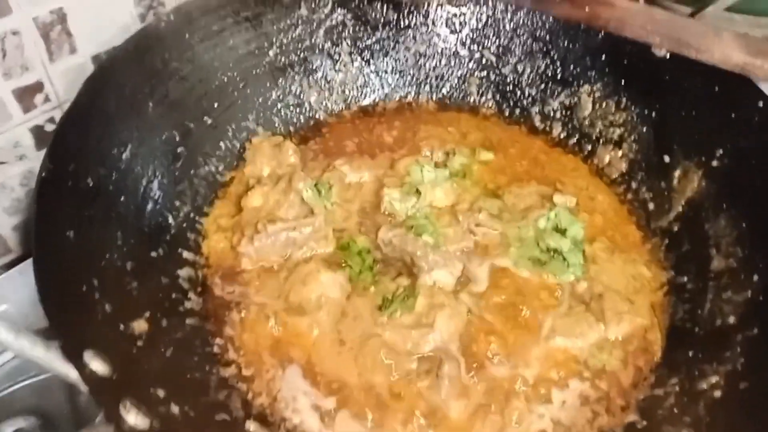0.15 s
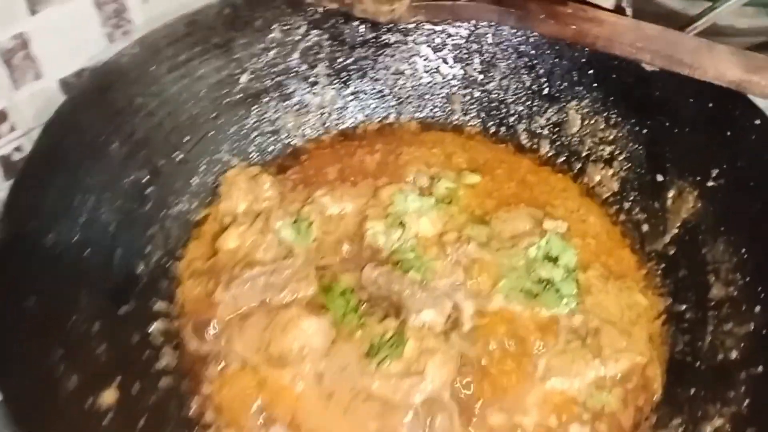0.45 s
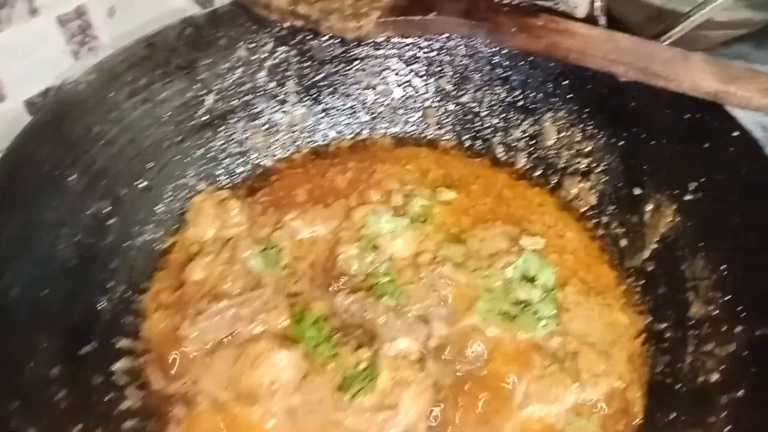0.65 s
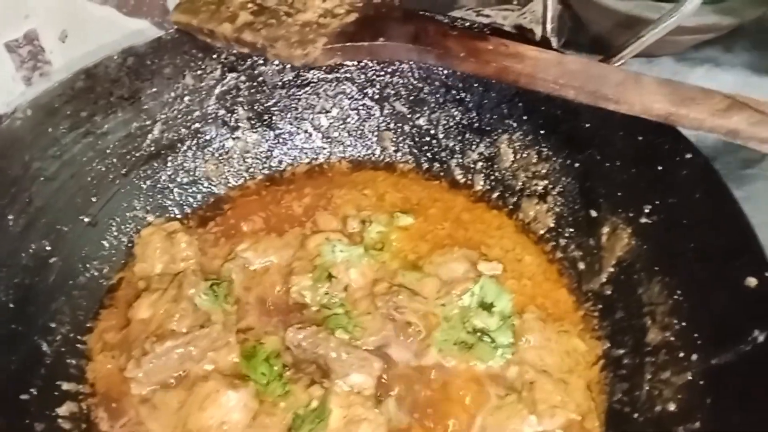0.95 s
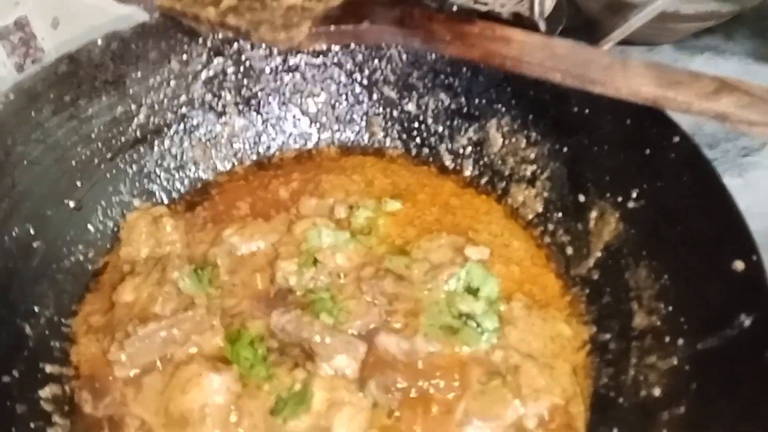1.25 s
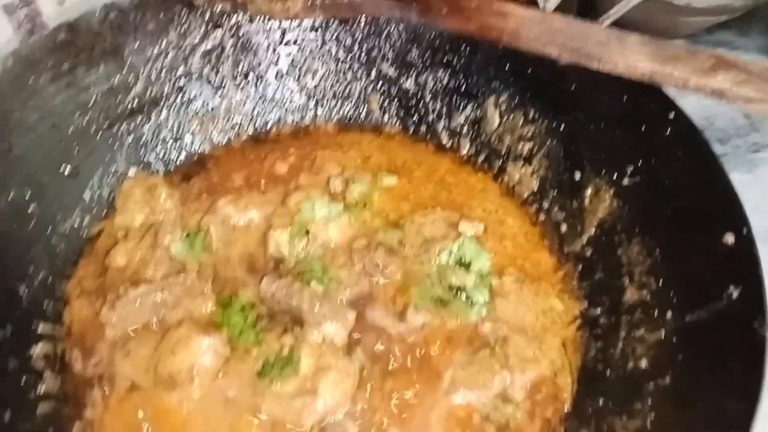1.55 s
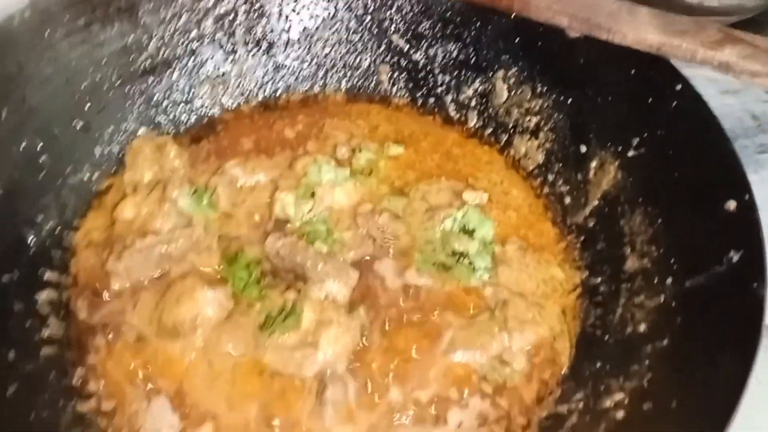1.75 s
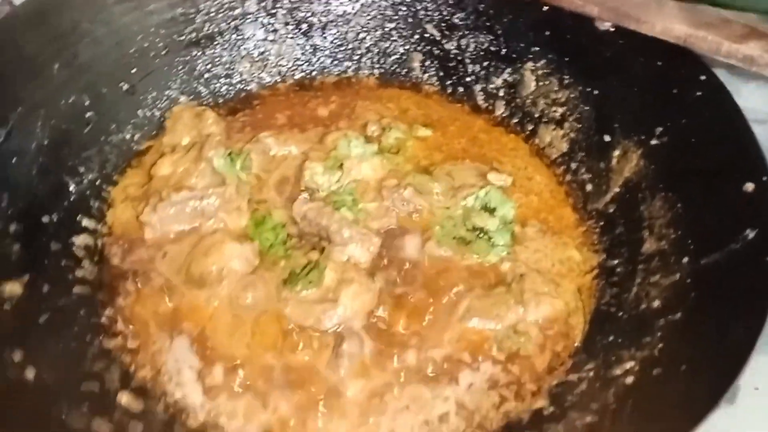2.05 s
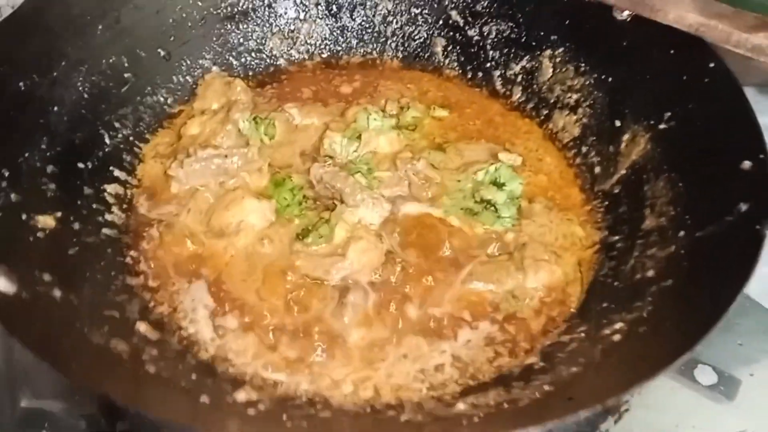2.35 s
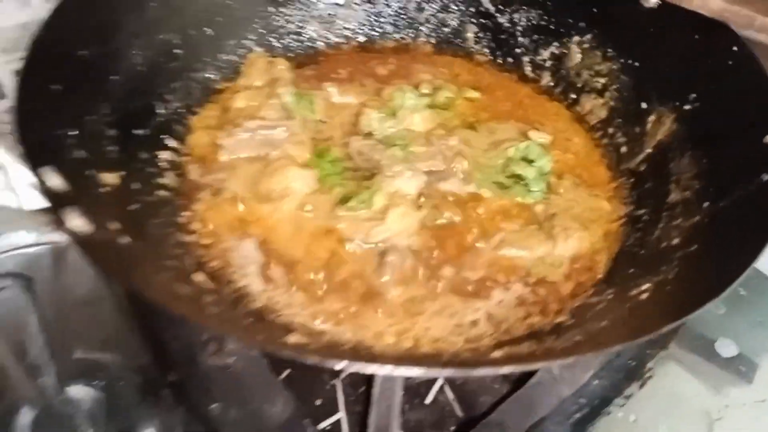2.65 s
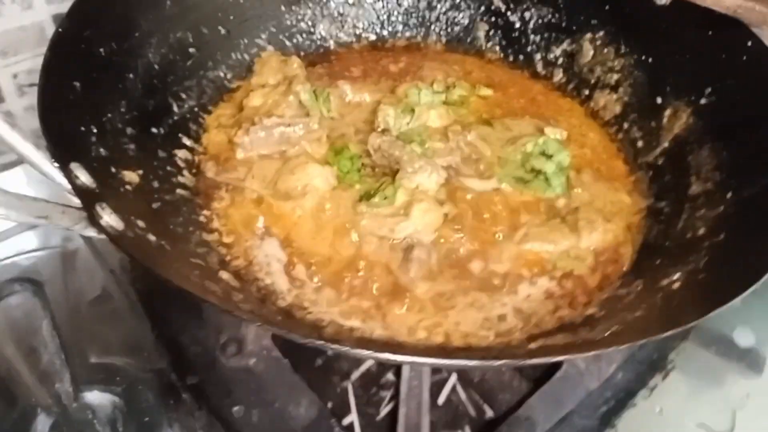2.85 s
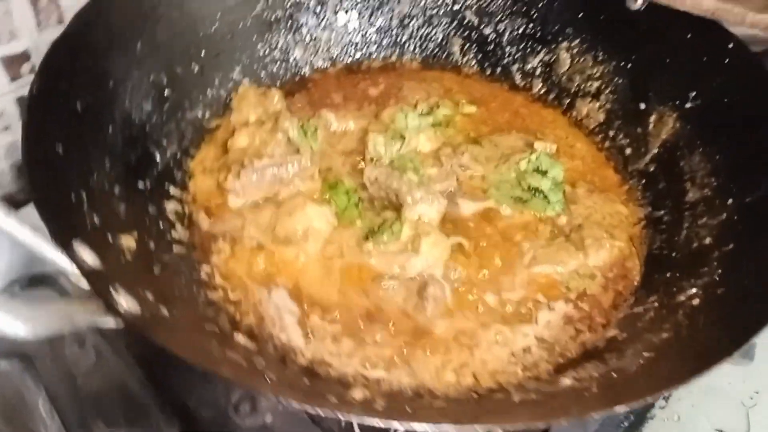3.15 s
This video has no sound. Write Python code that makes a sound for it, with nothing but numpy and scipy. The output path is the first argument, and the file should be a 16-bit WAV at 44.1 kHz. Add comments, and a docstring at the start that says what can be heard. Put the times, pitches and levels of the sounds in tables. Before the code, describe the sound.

Simmering gravy bubbles pop close up over faint fizz and gas hiss, with kitchen clatter behind

```python
"""Gravy simmering in a wok

Close under a phone held above the wok, thick gravy bubbles burst as short rising plinks over fizz and gas hiss.
Further off in the hard kitchen, grains of coloured noise drag and scrape, and decaying modes ring as a metal
pot is knocked and a hollow thing set down. A low hum and a few dull bumps lie beneath.
The phone's noise suppressor ducks the quiet floor and the tails in each band."""
import sys
import numpy as np
from scipy import signal
from scipy.fft import rfft, irfft
from scipy.io import wavfile
from scipy.ndimage import uniform_filter1d, map_coordinates

SR = 44100
rng = np.random.default_rng(int(sys.argv[2]) if len(sys.argv) > 2 else 0)


def wav_out(sig):
    """Save sig, one row per channel (or a flat mono array), as 16-bit PCM at SR to the path in sys.argv[1]."""
    wavfile.write(sys.argv[1], SR, np.round(np.clip(np.atleast_2d(sig).T, -1, 1) * 32767).astype(np.int16))


N = 145530  # 3.3 s

# Bubbles bursting close to the microphone; echo_db is the wok's echo against the pop
# columns: start_s, peak_db, pitch_hz, cycles (length of the swell and decay), echo_db
BUBBLES = [(0.0238, -40.5, 5900, 1.7, 8), (0.109, -45, 5840, 3.4, 10.5), (0.1526, -26, 4070, 3.2, -2.5),
           (0.17, -40, 4030, 5.8, 1), (0.2305, -37.5, 3730, 5.3, -0.5), (0.2823, -40.5, 4250, 5.3, 0),
           (0.3239, -31.5, 8840, 4.5, -8), (0.3661, -40, 3540, 9.6, 3.5), (0.4454, -49, 3560, 5, 8),
           (0.4648, -34, 3390, 7.2, -1), (0.4782, -32.5, 4400, 4.3, -1), (0.5362, -42, 3710, 5.6, -1.5),
           (0.6444, -45.5, 3340, 3, 8), (0.6565, -42, 3840, 3.5, 7), (0.67, -42.5, 3900, 2.7, 8),
           (0.7244, -34.5, 4060, 2.5, 1), (0.733, -36, 3820, 3.6, 4.5), (0.7504, -34.5, 4200, 2.4, 5.5),
           (0.7961, -37.5, 3930, 4.5, 2.5), (0.8425, -34.5, 4370, 1.34, 1.5), (0.8822, -46, 3620, 7.8, 6.5),
           (0.8893, -37.5, 4070, 7.3, -0.5), (0.9024, -40.5, 4200, 3.6, 2.5), (0.9602, -37.5, 3630, 5.3, 4),
           (0.9786, -37.5, 3470, 7.2, -6), (1.0674, -42.5, 4200, 2.6, 13), (1.0902, -32.5, 3370, 4.7, 1.5),
           (1.0929, -31, 3550, 2.4, -4.5), (1.1442, -37.5, 4100, 3.6, 5.5), (1.208, -41.5, 2570, 7, 4),
           (1.247, -33.5, 3600, 5.9, 1), (1.29, -30.5, 3320, 8.9, -5.5), (1.4354, -42.5, 3600, 5.7, 12),
           (1.465, -30.5, 3800, 6.2, -1), (1.7177, -21.5, 3490, 8, -2.5), (1.9407, -23.5, 3740, 6.6, -4.5),
           (2.0429, -42, 3070, 8, 3), (2.0564, -21, 4130, 11.5, -13), (2.1208, -31, 4220, 14.5, -4.5),
           (2.165, -38, 4000, 2.5, 8), (2.2322, -43, 3840, 2.9, 8.5), (0.2374, -48.5, 10400, 7.4, 0.5),
           (0.3737, -41.5, 5940, 6.3, 0), (0.4649, -37.5, 5100, 5, 6.5), (0.5784, -47, 6000, 9.9, 9),
           (0.7594, -46, 6180, 6.9, 5), (0.8923, -42.5, 6650, 4.3, 7.5), (1.145, -46, 7000, 11, -12),
           (1.151, -40, 7100, 11, -13), (1.1544, -42.5, 9900, 9.1, -0.5), (1.166, -45, 10800, 8, -6),
           (1.2412, -36, 8000, 1.1, 2), (1.2466, -32, 6930, 4.1, -2), (1.3014, -46, 7200, 6.6, 0),
           (1.9044, -43.5, 8100, 3.7, -6), (1.9914, -48, 6100, 4.6, 3), (2.152, -49, 6560, 5.2, 8),
           (2.17, -42, 9800, 5.1, -3), (2.2042, -42.5, 9300, 5.4, -3), (2.266, -44, 8400, 4.2, -4.5),
           (0.038, -51.5, 2450, 24, 3), (0.1043, -57.5, 2400, 14, 3), (0.2898, -53.5, 2360, 7.7, 6.5),
           (0.5546, -59, 1727, 32, 4.5), (1.281, -49.5, 1868, 15, 5), (2.003, -53, 1717, 47, 4),
           (2.1003, -58, 1230, 8.6, -2), (0.455, -55, 791, 22, 0), (0.512, -54.5, 504, 17, 0),
           (0.65, -57.5, 805, 16, -6), (0.672, -56, 2060, 30, 1), (0.735, -57, 1935, 26, -1),
           (0.795, -58.5, 2050, 22, -6), (0.872, -56.5, 776, 50, -3.5), (0.965, -62, 2450, 40, 3),
           (1.085, -56, 2320, 30, 0), (1.133, -57, 421, 10, -1.5), (0.8432, -40, 10000, 1.5, -6),
           (0.51, -42.5, 10000, 1.6, -2), (0.646, -43.5, 9700, 3.6, 1.5), (0.893, -42, 11300, 2.8, -3.5),
           (2.138, -48, 11500, 1.5, -6), (0.579, -36, 3830, 1.8, 1.5)]
SNAP_DB = -31  # against the pop
WOK_T60_S, WOK_ECHOES_PER_S = 0.13, 1600
WOK_RIPPLE_DB, WOK_RIPPLE_WIDTH_HZ = 8, 251.8  # the wok favours some narrow bands
# Froth close to the microphone: level over time; treble_db is against the body
# columns: time_s, level_db, treble_db
FROTH_LEVEL = [(0.1, -64, -1), (0.132, -54, 0), (0.15, -47.5, -7), (0.222, -52.5, -15), (0.228, -62, -23),
               (0.25, -59, -11)]
# Tone of the froth; columns: pitch_hz, level_db
FROTH_COLOUR = [(880, -57), (1500, -37), (2160, -7.5), (2660, -9), (4190, -0.5), (6360, -6), (12000, -13.5),
                (15600, -52), (22000, -120)]


def simmer():
    """Larger bubbles burst with a faint snap and echoes off the wok, amid tiny bubbles and a rustle of froth."""
    direct, wok = np.zeros(N), np.zeros(N)
    t = np.arange(SR // 10) / SR
    snaps = rng.standard_normal((len(BUBBLES), 40)) * np.exp(-np.arange(40) / 10)
    echoes = rng.standard_normal((len(BUBBLES), len(t)))
    echoes = echoes * (rng.random(echoes.shape) < WOK_ECHOES_PER_S / SR)
    echoes = echoes * decay(t, WOK_T60_S) * (t > .0015)
    for (start_s, db, hz, cycles, echo_db), snap, echo in zip(BUBBLES, snaps, echoes):
        pop = bubble(hz, cycles)
        start_s = start_s - .0005  # lead for the swell
        add(direct, start_s, undb(db) * pop)
        add(wok, start_s, undb(db + echo_db) * signal.fftconvolve(pop, unit_energy(echo)))
        add(direct, start_s, undb(db + SNAP_DB) * snap)
    wok_rms = np.sqrt(np.mean(wok ** 2))
    wok = unit(ripple(wok, WOK_RIPPLE_DB, WOK_RIPPLE_WIDTH_HZ)) * wok_rms
    return direct + wok + fizz() + rub(FROTH_LEVEL, FROTH_COLOUR)


POP_GLIDE = 0.036  # fractional pitch rise over each run of `cycles`


def bubble(hz, cycles):
    """A burst bubble swells fast, dies away and rises in pitch; peak near 1."""
    u = np.arange(int(3 * cycles * SR / hz) + 2) * hz / SR / cycles
    swell = np.e * 3 * u * np.exp(-3 * u)
    return swell * np.sin(2 * np.pi * cycles * (u + POP_GLIDE * u ** 2 / 2))


# Tiny bubbles close by, one row for each size; level_db is the faintest, extra_db the mean random lift
# columns: rate_per_s, pitch_hz, spread_octaves, level_db, extra_db, cycles
TINY_BUBBLES = [(62.4, 4310, 0.453, -64, 4, 7.4), (29.9, 500, 0.65, -62, 2.5, 14),
                (24.9, 2000, 0.29, -60, 0, 21), (89, 9600, 0.22, -62, 3, 2)]


def fizz():
    """Small bubbles of several sizes burst at random moments, with random pitches and levels."""
    out = np.zeros(N)
    for per_s, hz, octaves, db, extra_db, cycles in TINY_BUBBLES:
        starts_s = rng.random(size=400) * 400 / per_s
        pitches_hz = hz * 2 ** (octaves * rng.standard_normal(size=400))
        levels_db = db + extra_db * rng.exponential(size=400)
        for start_s, pitch_hz, level_db in zip(starts_s, pitches_hz, levels_db):
            if start_s < N / SR:
                add(out, start_s, undb(level_db) * bubble(min(pitch_hz, SR / 3), cycles))
    return out


# Knocks on a metal pot further off, some built of several close rows;
# pitch_hz is the pitch each row excites best
# columns: start_s, level_db, pitch_hz
POT_BLOWS = [(2.155, -41.5, 404), (2.342, -36.5, 2200), (2.41, -42, 450), (2.475, -35, 300),
             (2.501, -20, 950), (2.514, -15.5, 118), (2.522, -23, 1220), (2.341, -46.5, 8000),
             (2.353, -37.5, 3500), (2.512, -35, 8000), (2.535, -34, 5200), (2.54, -22, 428),
             (2.58, -33, 930)]
# Ringing modes of the pot; columns: pitch_hz, level_db, t60_s
POT_MODES = [(189.4, -3.5, 0.22), (239, -6, 0.38), (300, -2, 0.34), (700, -6, 0.23), (800, 2, 0.13),
             (847, -10, 0.4), (935, 0.5, 0.13), (1016.6, -3, 0.24), (1572, -17.5, 0.46), (1900, -18, .3),
             (2218, 4, 0.11), (2240, -6.5, 0.18), (2625, -15, 0.12), (2800, -10, 0.24), (3200, -10, 0.1),
             (3460, 3.5, 0.041), (3850, -1.5, 0.064), (4151, 0, 0.15), (4410, -3, .08), (5520, -19, .12),
             (3550, -8, 0.13), (6160, 3, 0.12), (6720, 2, 0.074), (7250, -10, 0.14), (8950, -2, 0.094),
             (9430, 0, 0.17)]


def pot_knocks():
    """Knocks on the metal pot set its modes ringing, some through several close rows of the table."""
    return struck(POT_BLOWS, POT_MODES)


# The hollow thing landing and bouncing further off; pitch_hz is what the blow excites best
# columns: start_s, level_db, pitch_hz
LANDINGS = [(2.95, -14.5, 347), (2.992, -24.5, 440), (3.033, -30, 380), (3.088, -32.5, 340)]
# Ringing modes of the hollow thing; columns: pitch_hz, level_db, t60_s
HOLLOW_MODES = [(162, -21, 0.24), (446, -10, 0.23), (464, 3, 0.076), (480, -14, 0.4), (610, -6, 0.1),
                (785, -8, 0.32), (964, -0.5, .2), (1290, -5, 0.2)]


def hollow_thuds():
    """The hollow thing lands and bounces, ringing its modes at each contact."""
    return struck(LANDINGS, HOLLOW_MODES)


REACH_OCT = 0.73  # a mode this far from the favoured pitch rings 8.9 dB weaker
RING_ROUGH_DB, RING_ROUGH_RAD, RING_ATTACK_S = 4.5, 0.6, 0.0013


def struck(blows, modes):
    """Each row of blows rings the modes, most of all those near its favoured pitch; each ring flutters."""
    out, t = np.zeros(N), np.arange(SR // 2) / SR
    for hz, mode_db, t60_s in modes:
        flutter = undb(RING_ROUGH_DB * walk(50.3)[:len(t)])
        phase = 2 * np.pi * hz * t + RING_ROUGH_RAD * walk(39.3)[:len(t)]
        attack = 1 - np.exp(-t / RING_ATTACK_S)
        ring = flutter * np.sin(phase) * attack * decay(t, t60_s)
        for start_s, db, best_hz in blows:
            loss_db = 8.9 * (np.log2(hz / best_hz) / REACH_OCT) ** 2
            add(out, start_s, undb(db + mode_db - loss_db) * ring)
    return out


# Something dragged further off: level over time ahead of distance; treble_db is against the body
# columns: time_s, level_db, treble_db
DRAG_LEVEL = [(1.41, -56, -3), (1.434, -46, -0.5), (1.468, -40.5, -12), (1.492, -55, -20), (1.5, -31, -21),
              (1.528, -37, -19), (1.532, -32, -2), (1.549, -30.5, -7.5), (1.551, -21, -7),
              (1.568, -24.5, -6), (1.585, -19.5, -10), (1.597, -27, -8), (1.625, -28.5, -13.5),
              (1.68, -37, -31), (1.7, -39, -24)]
# Tone of the drag; columns: pitch_hz, level_db
DRAG_COLOUR = [(29, -61), (50, -44), (131, 0.5), (234, -17.5), (556, -3.5), (612, -6), (944, -4.5),
               (1420, -3), (2090, -7.5), (2300, -3), (10200, -13.5), (12700, -24.5), (15800, -16.5)]


def drag():
    """Something is dragged, its surface colouring a dense run of tiny contacts."""
    return rub(DRAG_LEVEL, DRAG_COLOUR)


# The pot scraped further off: level over time ahead of distance; treble_db is against the body
# columns: time_s, level_db, treble_db
SCRAPE_LEVEL = [(2.33, -53, -9), (2.344, -46, -11), (2.354, -41, -18), (2.414, -41, -12),
                (2.474, -41.5, -5), (2.546, -25.5, -7.5), (2.636, -46, -9.5), (2.7, -50.5, -10)]
# Tone of the scrape; columns: pitch_hz, level_db
SCRAPE_COLOUR = [(29, -66), (50, -31), (175, -13.5), (343, -5.5), (543, -23), (837, -13), (1170, -18),
                 (2190, -20), (2660, -21.5), (4200, -18.5), (6330, -22.5), (7860, -29), (15800, -39.5)]
SCRAPE_RING_DB = -5.5
SCRAPE_DAMP = 0.28  # the contact shortens the rings to this fraction


def pot_scrape():
    """A scrape keeps the pot's modes ringing, damped by the contact."""
    scrape = rub(SCRAPE_LEVEL, SCRAPE_COLOUR)
    damped = [(hz, db, t60_s * SCRAPE_DAMP) for hz, db, t60_s in POT_MODES]
    ring = struck([(0.00093, 0, 3840)], damped)[:SR // 2]
    ringing = signal.fftconvolve(scrape, unit_energy(ring))[:N]
    return scrape + undb(SCRAPE_RING_DB) * ringing


# The hollow thing settling further off: level over time ahead of distance; treble_db is against the body
# columns: time_s, level_db, treble_db
SETTLE_LEVEL = [(2.94, -92, -21), (2.95, -27.5, -27), (2.958, -20, -7.5), (3.006, -25, -13.5),
                (3.082, -35, -21), (3.168, -43, -3), (3.22, -98, -19)]
# Tone of the settling; columns: pitch_hz, level_db
SETTLE_COLOUR = [(29, -122), (50, -25), (175, -5), (335, -15), (458, -5), (569, -13), (798, -10.5),
                 (878, -15.5), (991, -13.5), (4000, -15), (10200, -25), (12700, -36.5), (15800, -25.5)]


def settle():
    """The hollow thing grates as it settles, a dense run of tiny contacts."""
    return rub(SETTLE_LEVEL, SETTLE_COLOUR)


GRIT_PER_S, GRIT_SCATTER_DB, PATCHY_DB = 12000, 1, 1
RIPPLE_DB, RIPPLE_WIDTH_HZ = 3, 83  # rubbed things favour many narrow bands
RUB_MOTTLE_DB = 2


def rub(level, tone):
    """Dense uneven clicks coloured by the surface; body and treble follow their own levels, in patches."""
    hits = rng.random(N) < GRIT_PER_S / SR
    clicks = hits * rng.standard_normal(N) * undb(GRIT_SCATTER_DB * rng.exponential(size=N))
    surface = ripple(colour(clicks, tone), RIPPLE_DB, RIPPLE_WIDTH_HZ)
    body, treble = split(mottle(surface, RUB_MOTTLE_DB))
    time_s, db, treble_db = np.array(level).T
    rubbed = unit(body) * curve(time_s, db) + unit(treble) * curve(time_s, db + treble_db)
    return rubbed * undb(PATCHY_DB * walk(60))


ROOM_T60_S, ROOM_TREBLE_T60_S, ROOM_GAP_S = 0.32, 0.24, 0.00455


def room(x):
    """Dense echoes of the hard kitchen follow after a short gap; the treble fades sooner."""
    t = np.arange(SR) / SR
    low, high = split(rng.standard_normal(SR))
    tail = low * decay(t, ROOM_T60_S) + high * decay(t, ROOM_TREBLE_T60_S)
    return signal.fftconvolve(x, unit_energy(tail * (t > ROOM_GAP_S)))[:N]


# Tone of the burner under the wok; columns: pitch_hz, level_db
HISS_COLOUR = [(15, -67), (25, 17), (48, -32), (78, -4), (130, -15), (200, 0.5), (791, 0), (929, -3),
               (2030, -6), (3050, -7.5), (3580, -2.5), (5230, -11.5), (10500, -13.5), (13400, -21),
               (15800, -13)]
# Burner hiss over time, against HISS_DB; columns: time_s, level_db
HISS_COURSE = [(0, -1), (.7, -1.5), (1.4, -0.5), (1.85, -1), (2.3, -1.5), (2.8, -2), (3.3, -2.5)]
HISS_DB, FLICKER_DB, HISS_MOTTLE_DB = -58.5, 0.1, 2.5


def burner_hiss():
    """The gas burner is coloured noise that flickers a little, its bands swelling in patches."""
    flickering = rng.standard_normal(N) * undb(FLICKER_DB * walk(9))
    hiss = unit(mottle(colour(flickering, HISS_COLOUR), HISS_MOTTLE_DB))
    return hiss * undb(HISS_DB) * curve(*np.array(HISS_COURSE).T)


# Low hum in the background; columns: pitch_hz, level_db, wavers_per_s
HUM_TONES = [(100.5, -67.5, 27), (147.4, -69, 3.2), (303, -76, 12)]
HUM_WAVER_DB, HUM_WAVER_RAD = 4.5, 0.9


def low_hum():
    """A few low tones waver in level and phase."""
    t, out = np.arange(N) / SR, np.zeros(N)
    for hz, db, per_s in HUM_TONES:
        level = undb(db + HUM_WAVER_DB * walk(per_s))
        out += level * np.sin(2 * np.pi * hz * t + HUM_WAVER_RAD * walk(per_s))
    return out


# Dull bumps at the microphone; columns: start_s, level_db, pitch_hz, cycles
LOW_BUMPS = [(1.533, -55, 119, 4.2), (1.6, -44.5, 74.6, 5.1), (1.781, -49, 78, 4.2), (1.899, -51, 93, 4.8),
             (2.96, -38, 79.8, 5.6)]


def bumps():
    """Dull low bumps, perhaps from the hand on the phone, are short swelling and dying tones."""
    out = np.zeros(N)
    for start_s, db, hz, cycles in LOW_BUMPS:
        add(out, start_s, undb(db) * bubble(hz, cycles))
    return out


def undb(db):
    """Decibels to amplitude."""
    return 10 ** (np.asarray(db) / 20)


def unit(x):
    """Scale to an rms of 1."""
    return x / np.sqrt(np.mean(x ** 2))


def unit_energy(x):
    """Scale to a total energy of 1."""
    return x / np.sqrt(np.sum(x ** 2))


def decay(t, t60_s):
    """Exponential fade, down 60 dB after t60_s."""
    return np.exp(-np.log(1000) * t / t60_s)


def add(out, start_s, x):
    """Mix x in from start_s on."""
    i = int(start_s * SR)
    out[i:i + len(x)] += x[:N - i]


def curve(time_s, db):
    """Gain over time from dB points, silent outside."""
    return undb(np.interp(np.arange(N) / SR, time_s, db, left=-200, right=-200))


def walk(rate):
    """Random levels, a new one every 1 / rate s, joined by straight lines; spread near 1."""
    levels = rng.standard_normal(size=400)
    return np.interp(np.arange(N) * rate / SR, np.arange(len(levels)), levels) * 1.2


def colour(x, tone):
    """Shape the spectrum of a noise by (pitch_hz, level_db) points, to an rms of 1."""
    hz, db = np.array(tone).T
    log_f = np.log(np.maximum(np.arange(N // 2 + 1) * SR / N, 1))
    gain = undb(np.interp(log_f, np.log(hz), db, left=-70))
    return unit(irfft(rfft(x) * gain, N))


SPLIT_HZ = 4500


def split(x):
    """Part the sound into body below and treble above SPLIT_HZ."""
    f = np.arange(len(x) // 2 + 1) * SR / len(x)
    low = irfft(rfft(x) / (1 + (f / SPLIT_HZ) ** 6), len(x))
    return low, x - low


RIPPLE_FROM_HZ = 1400  # half depth here, nearing full depth above


def ripple(x, depth_db, width_hz):
    """Many small resonances at random pitches, deeper towards the treble."""
    f = np.arange(N // 2 + 1) * SR / N
    db = np.interp(f / width_hz, np.arange(600), rng.standard_normal(size=600))
    return irfft(rfft(x) * undb(depth_db * db * f / (f + RIPPLE_FROM_HZ)), N)


MOTTLE_HZ, MOTTLE_S = 492.4, .03  # size of a patch


def mottle(x, spread_db):
    """Neighbouring bands swell and sink in small patches of their own."""
    f, t, bands = signal.stft(x, SR, nperseg=256)
    field = rng.standard_normal((120, 400))
    at = np.meshgrid(f / MOTTLE_HZ, t / MOTTLE_S, indexing="ij")
    gain = undb(spread_db * map_coordinates(field, at, mode="mirror"))
    return signal.istft(bands * gain, SR, nperseg=256)[1][:N]


FAR_DRY_DB = -3  # direct sound of the far rubs
POP_ROOM_DB, FAR_ROOM_DB, RING_ROOM_DB = -17.5, -11, -10  # sent to the kitchen's echoes


def scene():
    """The wok close by, the handling further off, the kitchen's echoes, the burner, the hum and the bumps."""
    near = simmer()
    rubs = drag() + pot_scrape() + settle()
    rings = pot_knocks() + hollow_thuds()
    wet = room(undb(POP_ROOM_DB) * near + undb(FAR_ROOM_DB) * rubs + undb(RING_ROOM_DB) * rings)
    # the floor is raised by as much as the suppressor can duck it
    floor = (burner_hiss() + low_hum()) * undb(-DUCK_DB)
    return (near + undb(FAR_DRY_DB) * rubs + rings + wet + floor + bumps())[None]


LOW_HZ, TOP_HZ = 69, 15900  # the microphone path passes what lies between
DUCK_DB, MARGIN_DB, HOLD_S = -4, 2.75, 0.028  # deepest duck, margin above quiet, time constant of closing


def record(dry):
    """The suppressor ducks every band near its usual quiet level, closing slowly; lows and top are cut."""
    x = signal.sosfilt(signal.butter(2, LOW_HZ, "high", fs=SR, output="sos"), dry[0])
    bands = signal.stft(x, nperseg=512, noverlap=384)[2]
    power = uniform_filter1d(np.abs(bands) ** 2, size=11, axis=0)
    power = uniform_filter1d(power, size=3, axis=1)
    keep = np.exp(-128 / SR / HOLD_S)  # for each step of 128 samples
    held = signal.lfilter([1 - keep], [1, -keep], power, axis=1)
    power = np.maximum(power, held)
    # doubled dB, as these are powers
    quiet = np.percentile(power, 30, axis=1, keepdims=True) * undb(2 * MARGIN_DB)
    gain = np.sqrt(np.maximum(1 - quiet / power, undb(2 * DUCK_DB)))
    out = signal.istft(bands * gain, nperseg=512, noverlap=384)[1][:N]
    return signal.sosfilt(signal.ellip(10, .2, 70, TOP_HZ, fs=SR, output="sos"), out)[None]


dry = scene()
out = record(dry)
wav_out(out)
```